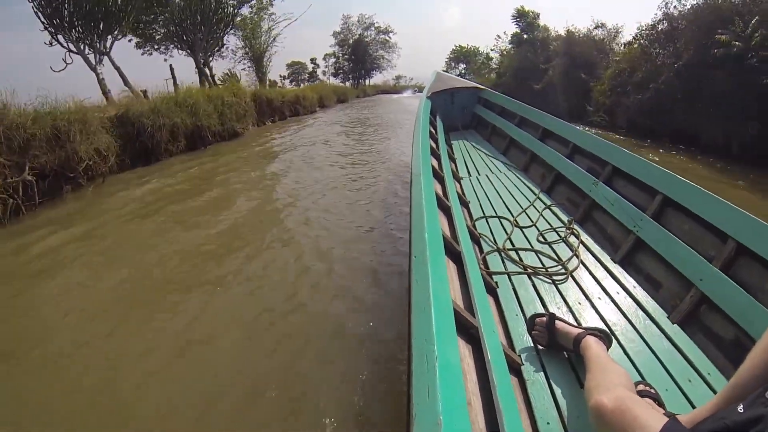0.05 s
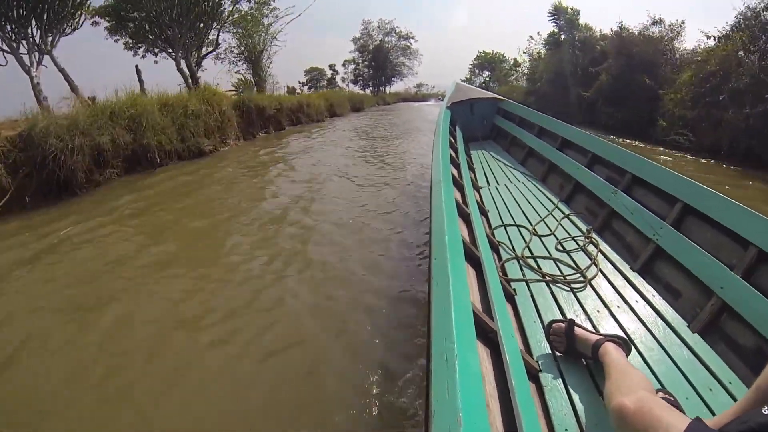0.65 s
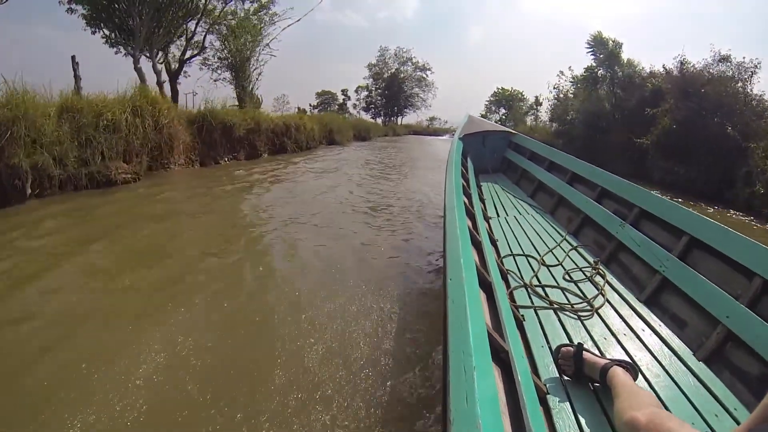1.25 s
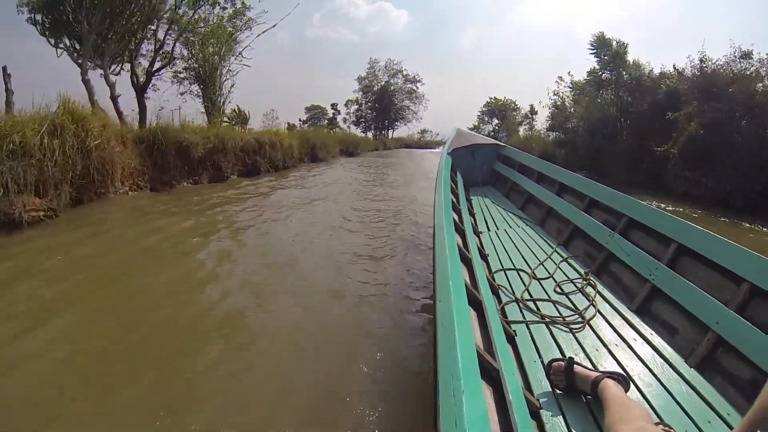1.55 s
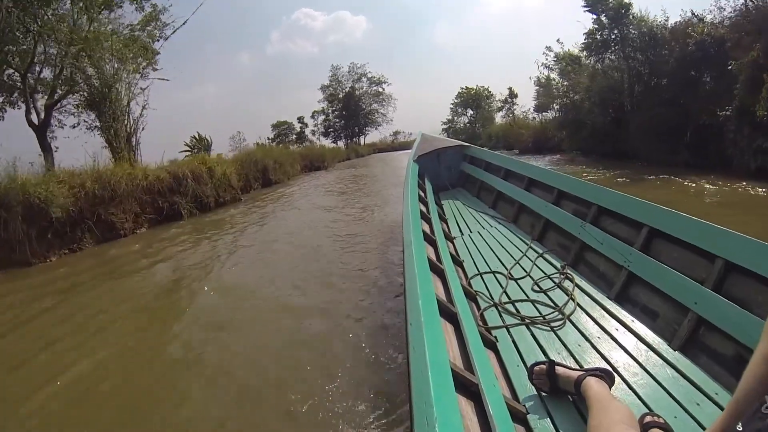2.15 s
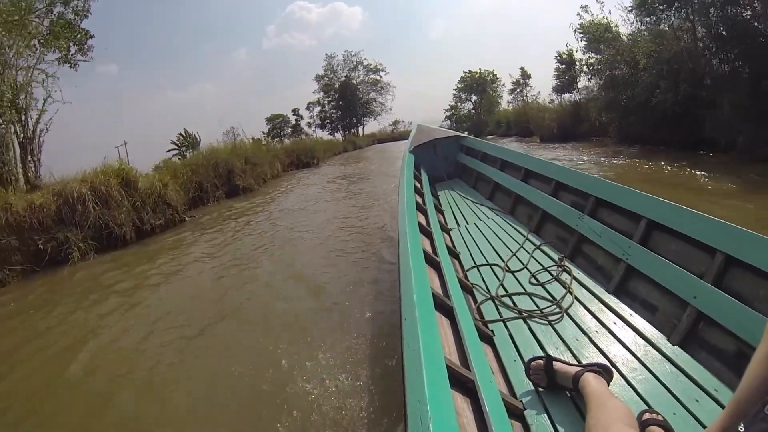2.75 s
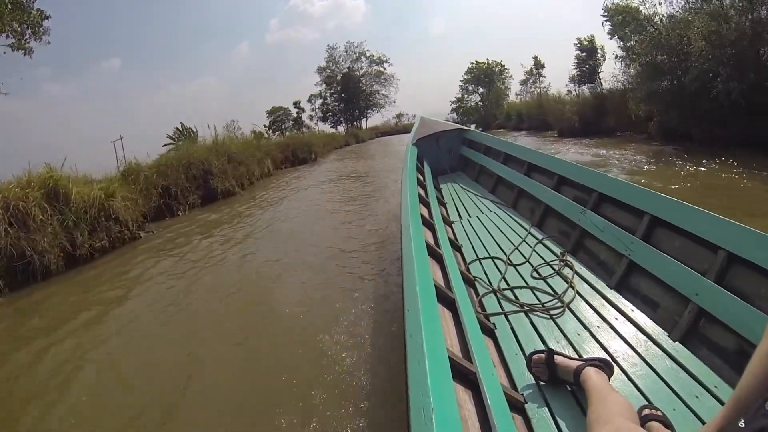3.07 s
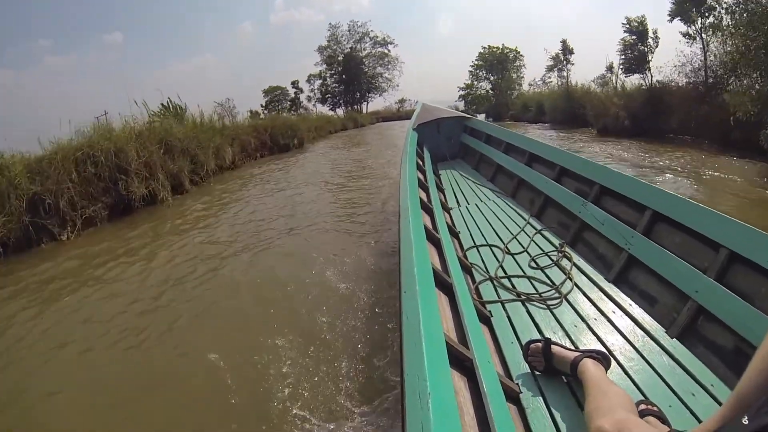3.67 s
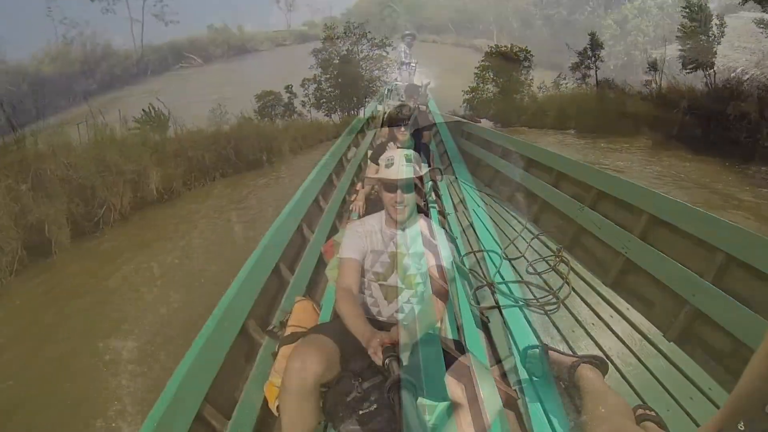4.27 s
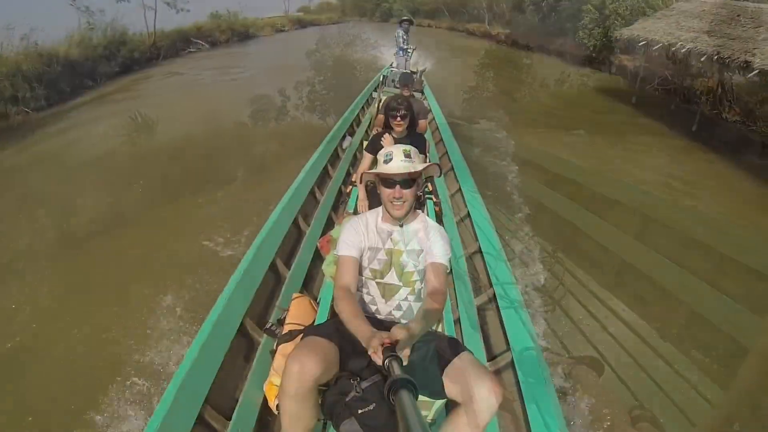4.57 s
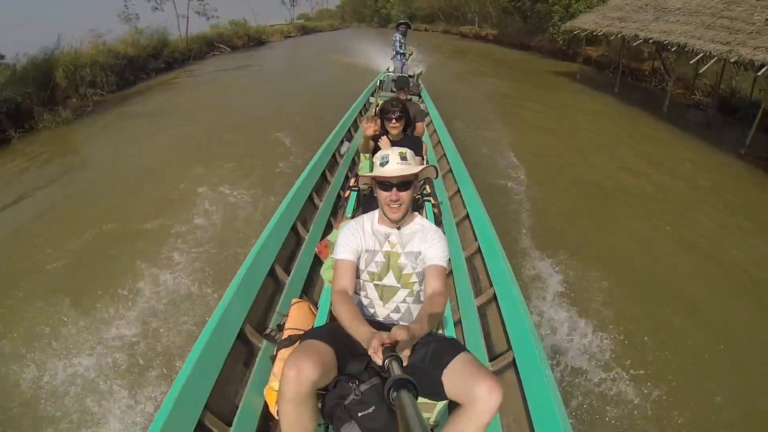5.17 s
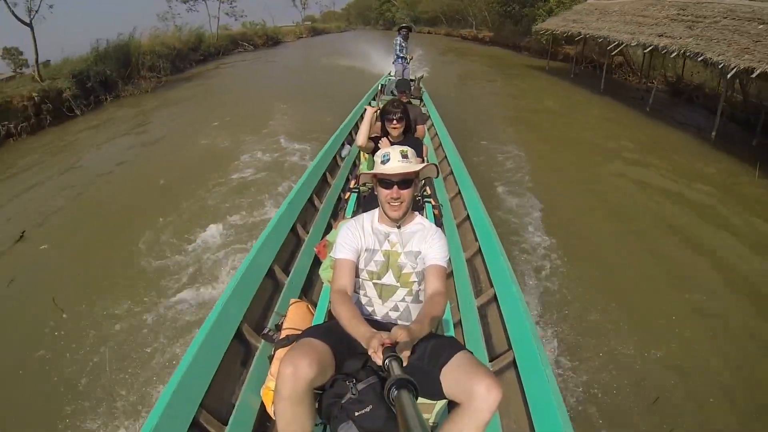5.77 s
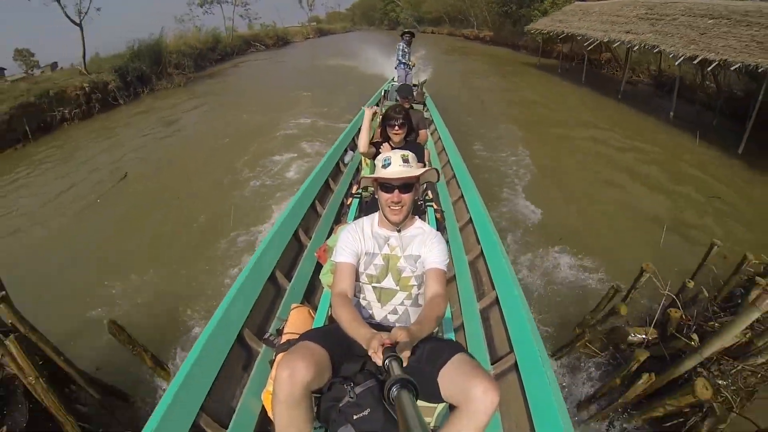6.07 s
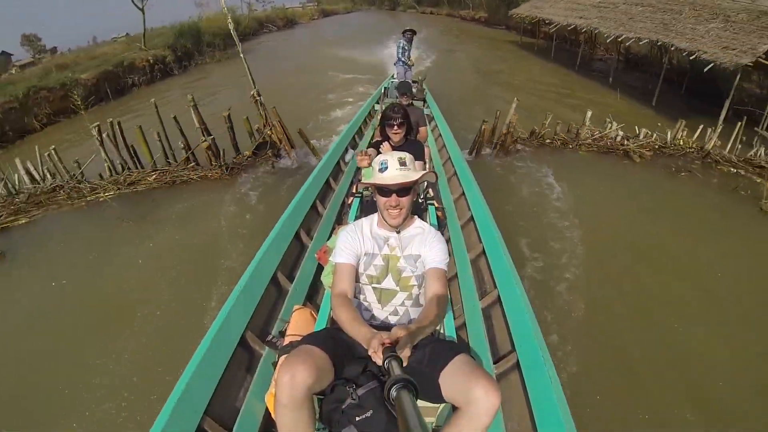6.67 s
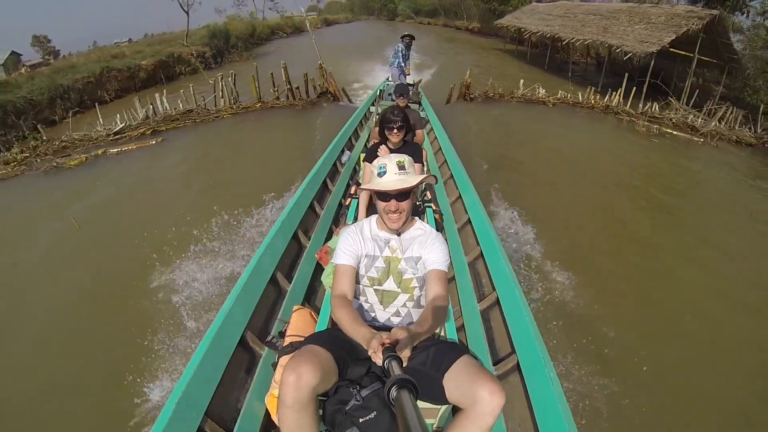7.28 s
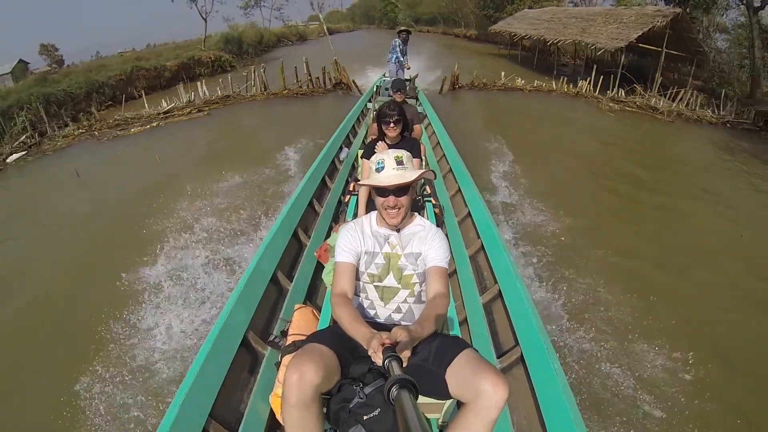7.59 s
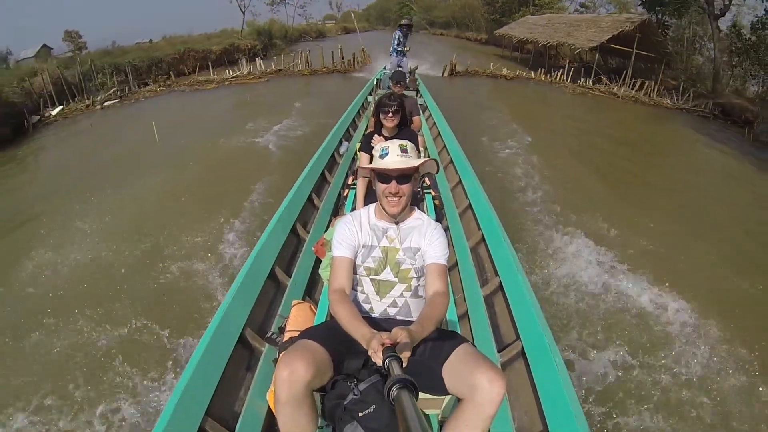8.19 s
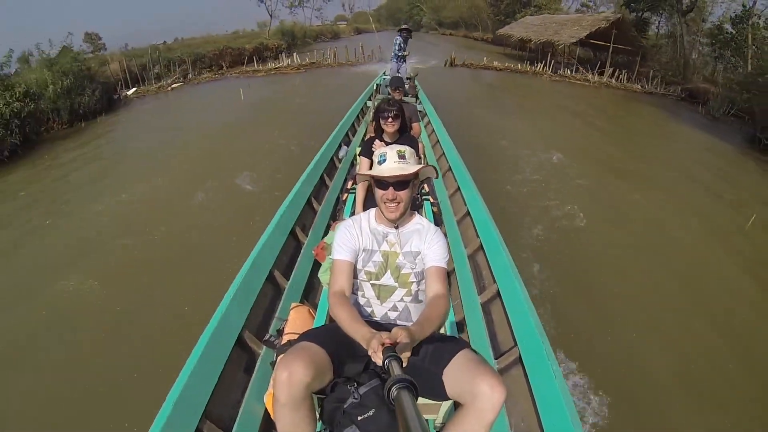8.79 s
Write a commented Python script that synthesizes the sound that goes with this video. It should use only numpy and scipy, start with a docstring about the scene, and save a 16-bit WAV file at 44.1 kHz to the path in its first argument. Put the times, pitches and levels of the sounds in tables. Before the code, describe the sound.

Fast, knocking boat engine on a river, with water slapping the hull, wind and spray; it eases off briefly, then knocks hard again.

```python
"""Long-tail boat on a river channel

A single-cylinder diesel fires about 13 times a second; each blast excites exhaust, hull and metal.
Facing the bow, ripples slap the hull, and bumps on the microphone case make the gain control duck.
The sound then dissolves to a place facing the stern, with spray, wind and gear whine, where the
engine is throttled back for a while and waves knock on the planks."""
import sys
import numpy as np
from scipy import signal
from scipy.fft import rfft, irfft, next_fast_len
from scipy.io import wavfile
from scipy.ndimage import uniform_filter1d, minimum_filter1d

SR = 44100
rng = np.random.default_rng(int(sys.argv[2]) if len(sys.argv) > 2 else 0)


def transcribe(signal):
    """Save signal, clipped to [-1, 1], as a 16-bit WAV file at the path in sys.argv[1]."""
    frames = np.atleast_2d(signal).T
    limited = np.clip(frames, -1, 1)
    pcm = np.round(limited * 32767).astype(np.int16)
    wavfile.write(sys.argv[1], SR, pcm)


N = 389835
TIME = np.arange(N) / SR


def from_db(db):
    """Amplitude ratio of a level in decibels."""
    return 10 ** (np.asarray(db) / 20)


def rms_one(x):
    """Normalisation to unit rms."""
    return x / np.sqrt(np.mean(x ** 2) + 1e-20)


def curve(rows, times=TIME):
    """Linear interpolation between (t/s, value) rows."""
    return np.interp(times, *np.transpose(rows))


def drift(rate_hz):
    """Slow random modulation: low-passed Gaussian noise of unit rms."""
    step = 40   # samples per noise value
    r = np.exp(-2 * np.pi * rate_hz * step / SR)
    slow = signal.lfilter([1], [1, -2 * r, r * r], rng.standard_normal(N // step + 2002))[2000:]
    return np.interp(np.arange(N) / step, np.arange(len(slow)), rms_one(slow))


def band(x, low_hz, high_hz):
    """Four-pole band-pass filter."""
    edges = np.clip([low_hz, high_hz], 10, SR / 2 - 100)
    return signal.sosfilt(signal.butter(2, edges, "band", fs=SR, output="sos"), x + 1e-18)


def soften(x, hz):
    """Two one-pole low-passes spread an impulse in time, as a soft contact does."""
    r = np.exp(-2 * np.pi * hz / SR)
    return signal.lfilter([(1 - r) ** 2], [1, -2 * r, r * r], x + 1e-18)


def ring(force, modes):
    """Modal superposition: each mode (f/Hz, level/dB, T60/s) is a damped oscillator."""
    out = 0
    for hz, db, t60 in modes:
        r = np.exp(-np.log(1000) / (t60 * SR))
        real = r * np.cos(2 * np.pi * hz / SR)
        out = out + from_db(db) * signal.lfilter([1, -real], [1, -2 * real, r * r], force + 1e-18)
    return out


def impulses(times, sizes):
    """Impulse train: one sample of force at each time."""
    out = np.zeros(N)
    np.add.at(out, np.clip(np.asarray(times) * SR, 0, N - 1).astype(int), sizes)
    return out


def burst(since, rise_s, fall_s):
    """Transient envelope: Gaussian rise to time zero, then exponential decay."""
    return np.exp(-(np.minimum(since, 0) / rise_s) ** 2 - np.maximum(since, 0) / fall_s)


def turbulence(spectrum, patchy_db, rate_hz):
    """Flow noise of unit rms, whose third-octave bands swell partly together and partly alone."""
    hz, db = np.transpose(spectrum)
    edges = np.geomspace(hz[0], hz[-1], int(3 * np.log2(hz[-1] / hz[0])) + 2)
    white = rng.standard_normal((2, N))
    together = 0.37 * drift(rate_hz)
    out = 0
    for k, (low, high) in enumerate(zip(edges, edges[1:])):
        out = out + band(white[k % 2], low, high) * from_db(patchy_db * (together + drift(rate_hz)))
    size = next_fast_len(N)
    bin_hz = np.maximum(np.arange(size // 2 + 1) * SR / size, 1)
    shape = from_db(np.interp(np.log(bin_hz), np.log(hz), db))
    return rms_one(irfft(rfft(out, size) * shape, size)[:N])


def firings(speed, first_s):
    """Phase is the integral of rate: firing times, and each sample's time since its beat and index."""
    cycles = np.cumsum(curve(speed)) / SR
    cycles -= np.interp(first_s, TIME, cycles)
    times = np.interp(np.arange(int(cycles[-1]) + 1), cycles, TIME)
    times += rng.normal(0, .0005, len(times))
    beat = np.clip(np.floor(cycles + .1), 0, len(times) - 1).astype(int)   # starts 0.1 cycle early
    return times, TIME - times[beat], beat


def loose_parts(per_s, spread_db):
    """Chatter as a Poisson process: uneven clicks at random times, of unit rms."""
    sizes = from_db(spread_db * np.minimum(rng.exponential(1, N), 4)) * rng.choice([-1, 1], N)
    return rms_one(sizes * (rng.random(N) < per_s / SR))


def exhaust(since, beat, load, body, *, hold_s, fall_s, repeat_share, crack_db, tail_db,
            valve_db, piston_db, clatter_db, uneven_db):
    """Source and filter: gas blast, crack, valves, piston and loose parts excite the body resonances."""
    def per_firing(db, spread_db):
        return from_db(db + spread_db * rng.standard_normal(beat[-1] + 1))[beat]

    force = per_firing(0, uneven_db)
    age = since + 0.0027   # the blast leads the beat
    blast = force * burst(age - np.clip(age, 0, hold_s), 0.00066, fall_s)
    tail = from_db(tail_db) * burst(since, 0.0017, 0.019)
    valves = burst(since - 0.0183, .003, 0.0098) + .7 * burst(since - 0.06, .003, 0.0098)   # two close
    valves *= per_firing(valve_db, 0.95)
    # part of the blast's treble repeats on every stroke; the rest is fresh turbulence
    stroke = band(rng.standard_normal((3, SR)), 1850, 24000)[:, (since * SR).astype(int) % SR]
    fresh = np.sqrt((1 - repeat_share) * blast ** 2 + tail ** 2 + valves ** 2)
    gas = np.sqrt(repeat_share) * blast * stroke + fresh * rng.standard_normal((3, N))
    onsets = np.maximum(np.diff(1. * (since > -.001), prepend=0), 0)
    crack = from_db(crack_db) * soften(onsets * force, 518)
    compressing = (since > .06) | (age < 0)
    piston = from_db(piston_db) * compressing * band(rng.standard_normal(N), 2090, 3400)
    clatter = from_db(clatter_db) * loose_parts(per_s=300, spread_db=1.5)
    source = (gas + crack + piston + clatter) * from_db(curve(load))
    out = 0
    for k, (hz, width, db) in enumerate(body):
        low = np.hypot(hz, width / 2) - width / 2   # hz is the band's geometric centre
        out = out + band(source[k % 3] * per_firing(db, uneven_db), low, low + width)
    return out


def thump(times, load, modes, soft_hz):
    """Impulse response of the hollow hull to each firing's pressure pulse, which grows with load."""
    sizes = from_db(0.63 * curve(load, times) + 2 * rng.standard_normal(len(times)))
    return ring(soften(impulses(times - .002, sizes), soft_hz), modes)


def struck_metal(times, blows, modes, uneven_db=3):
    """Free vibration of the engine's metal: each firing strikes each mode with its own strength."""
    strengths = from_db(uneven_db * rng.standard_normal((len(times), len(modes))))
    return sum(ring(impulses(times, blows * size), [mode]) for mode, size in zip(modes, strengths.T))


# firing rate: t/s, f/Hz
BOW_FIRING_RATE = [(0, 12.687), (1, 12.881), (1.8, 12.935), (2.4, 13.158), (3, 13.114), (3.5, 13.301),
                   (4.4, 13.036)]
# engine load, as strength of the beats: t/s, level/dB
BOW_LOAD = [(0, -4.5), (2.2, -6), (2.95, -1.5), (3.4, -5.5), (4.15, -4), (4.6, -2)]
# resonances of exhaust and microphone case: f/Hz, bandwidth/Hz, level/dB
BOW_RESONANCES = [(841, 160, -17.5), (1368, 156, 2.5), (1530, 197, -2), (2117, 320, -13), (2616, 145, -15),
                  (3090, 330, -15), (3485, 133, -17), (4063, 194, -16), (5310, 440, -26.5),
                  (6200, 2300, -33), (7640, 1070, -25), (10180, 1860, -35.5), (12300, 680, -37),
                  (14200, 550, -41)]
# modes of the hollow hull and of the engine's metal: f/Hz, level/dB, T60/s
BOW_HULL_MODES = [(65, -16.5, 0.057), (38, -38, 0.36), (135.5, -23, 0.095)]
BOW_METAL_MODES = [(527, -53, .3), (1363, -44.5, .3), (2028, -45.5, .3), (2420, -49, .35), (3533, -47, .3),
                   (5160, -47.5, .07), (7010, -49.5, .05), (9870, -61, .04)]
def bow_engine():
    """Periodic excitation: the diesel drives exhaust, hull and metal, heard facing the bow."""
    times, since, beat = firings(BOW_FIRING_RATE, first_s=.012)
    blasts = exhaust(since, beat, BOW_LOAD, BOW_RESONANCES, hold_s=0.0027, fall_s=0.0029,
                     repeat_share=0.33, crack_db=30.5, tail_db=-13, valve_db=-12,
                     piston_db=-11, clatter_db=-21, uneven_db=2)
    boom = thump(times, BOW_LOAD, BOW_HULL_MODES, soft_hz=215)
    return blasts + boom + struck_metal(times, 0.95, BOW_METAL_MODES)


# spectral densities of the water along the hull: f/Hz, level/dB
BOW_WASH_SPECTRUM = [(120, -17), (200, -13), (437, -22), (525, -9), (607, -20.5), (827, -11), (957, -21),
                     (1400, -6.5), (1840, -13), (2090, -14), (3480, -22), (4580, -25), (7760, -33),
                     (13900, -50.5), (15500, -56)]
BOW_RUMBLE_SPECTRUM = [(12, -44), (20, 4), (36, 4), (81, -2.5), (129, 4.5), (173, -14), (233, -8.5),
                       (300, -20), (400, -19), (520, -32), (880, -120)]
def bow_water():
    """Turbulent flow along the hull gives a broadband wash over a low rumble."""
    wash = from_db(-40.5) * turbulence(BOW_WASH_SPECTRUM, patchy_db=2.04, rate_hz=12)
    rumble = from_db(-33) * turbulence(BOW_RUMBLE_SPECTRUM, patchy_db=-1, rate_hz=4.9)
    return wash + rumble


# impacts of the larger ripples: t/s, level/dB
LARGE_RIPPLES = [(.44, -15), (.602, -10.5), (1.711, -9), (1.978, -11), (2.383, -16), (2.586, -13),
                 (2.782, -8), (3.041, -5.5), (3.485, -11.5), (3.643, -8), (3.915, -10), (4.065, -9.5)]
# modes of the slapped hull: f/Hz, level/dB, T60/s
SLAP_MODES = [(134, 2.5, 0.15), (94.5, -41, 0.059), (231, -23, 0.14)]
def hull_slaps(small_per_s=4, until_s=4.55):
    """Soft impacts: large and small ripples ring the hull, and water churns briefly after each."""
    count = int(small_per_s * until_s)
    offset, size = rng.random((count, 2)).T
    small_ripples = np.column_stack([(np.arange(count) + offset) / small_per_s, -20 + 6 * size])
    times, db = np.vstack([LARGE_RIPPLES, small_ripples]).T
    slaps = ring(soften(impulses(times, from_db(db)), 121), SLAP_MODES)
    churn = sum(from_db(level) * burst(TIME - at - .008, 0.012, 0.033) for at, level in zip(times, db))
    return slaps + from_db(-22.5) * churn * rms_one(band(rng.standard_normal(N), 183, 233))


# bumps on the microphone case: t/s, level/dB, cutoff/Hz, scrape/dB, scrape decay/s, boom/dB
CASE_BUMPS = [(0.6429, 17, 850, -15, 0.0036, -21), (0.645, 25.5, 680, -3, 0.0048, 5.5),
              (.665, -5.5, 1600, -28, .006, -4), (.721, 1, 905, -16, 0.0047, -11),
              (0.7364, 4.5, 1590, -19, 0.0023, -21), (0.738, 2, 1180, -7.5, 0.0048, 6),
              (0.973, 25.5, 2040, 8, 0.0018, 6.5), (0.9749, 25.5, 1650, -2.5, 0.0038, -10),
              (1.066, -16, 800, -13.5, 0.0065, -3), (1.074, 21.5, 186, -13, .003, -2)]
# modes of the case and of its mount: f/Hz, level/dB, T60/s
CASE_MODES = [(42.7, -7.5, 0.021), (260, -14.5, 0.025), (414, -10.5, 0.0082), (825, -4, 0.0067),
              (1360, -2.5, 0.0074), (1540, -30, 0.013), (2710, -7.5, 0.0068)]
MOUNT_MODES = [(133.1, 1, 0.31), (228, -4, .08)]
def case_bumps():
    """Structure-borne sound: each bump pushes and scrapes the case and sets its mount humming."""
    knocks = 0
    for at, db, cutoff_hz, scrape_db, scrape_s, _ in CASE_BUMPS:
        scrape = from_db(scrape_db) * burst(TIME - at, 0.00023, scrape_s) * rng.standard_normal(N)
        contact = ring(impulses([at], from_db(db)) + band(scrape, 400, 8000), CASE_MODES)
        softness = signal.butter(4, cutoff_hz, fs=SR, output="sos")   # soft contacts lose treble
        knocks = knocks + signal.sosfilt(softness, contact)
    times, *_, boom_db = np.transpose(CASE_BUMPS)
    return knocks + ring(soften(impulses(times, from_db(boom_db)), 370), MOUNT_MODES)


# firing rate: t/s, f/Hz
STERN_FIRING_RATE = [(4, 13.303), (4.8, 13.45), (5.6, 13.55), (6.3, 13.412), (6.8, 13.041), (7.5, 10.539),
                     (8.2, 10.96), (8.8, 11.33)]
# engine load; the throttle is shut from 6.8 to 8.2 s, then the engine knocks hard: t/s, level/dB
STERN_LOAD = [(4.3, -23.5), (4.6, -11), (5.4, -17.5), (6.05, -13.5), (6.81, -19.5), (6.88, -31.5),
              (8.13, -34), (8.21, -13.5), (8.8, -24)]
# resonances of exhaust and microphone case: f/Hz, bandwidth/Hz, level/dB
STERN_RESONANCES = [(820, 430, -9.5), (1338, 72, 2.5), (1670, 340, -8.5), (2366, 290, -4.5),
                    (2836, 250, -5), (3310, 580, -16), (4160, 340, -16.5), (4900, 1240, -21.5),
                    (7520, 770, -19.5), (8880, 310, -21.5), (10130, 1500, -30.5), (9600, 1500, -42),
                    (12700, 550, -54), (13730, 990, -39)]
# modes of the hollow hull and of the engine's metal: f/Hz, level/dB, T60/s
STERN_HULL_MODES = [(49, -12.5, 0.12), (40, -24.5, 0.14)]
STERN_METAL_MODES = [(2404, -75, 0.24), (3810, -50, 0.038), (5456, -53, 0.087), (7750, -53, .005),
                     (11500, -51, .004)]
def stern_engine():
    """Periodic excitation heard facing the stern; harder firings ring the metal harder."""
    times, since, beat = firings(STERN_FIRING_RATE, first_s=3.97)
    blasts = exhaust(since, beat, STERN_LOAD, STERN_RESONANCES, hold_s=0.0028, fall_s=0.0033,
                     repeat_share=0.28, crack_db=8, tail_db=-12.5, valve_db=-39,
                     piston_db=-13, clatter_db=-26, uneven_db=1.6)
    boom = thump(times, STERN_LOAD, STERN_HULL_MODES, soft_hz=232)
    blows = rms_one(from_db(curve(STERN_LOAD, times)))
    return blasts + boom + struck_metal(times, blows, STERN_METAL_MODES)


# spray of the wake, which falls as the throttle shuts and builds again: t/s, level/dB
WAKE_LEVEL = [(4.5, -53), (4.95, -49), (6.1, -48), (6.55, -54), (7, -59.5), (7.7, -50.5), (8.22, -46.5),
              (8.47, -53), (8.84, -51.5)]
# spectral densities of wash and spray: f/Hz, level/dB
STERN_WASH_SPECTRUM = [(150, -14), (250, -9), (388, -6), (501, -22.5), (544, -11.5), (702, -11.5),
                       (779, -8.5), (1140, -12), (1460, 4.5), (1800, -8.5), (2060, -15.5), (2400, -6.5),
                       (2630, -15), (3030, -11), (4000, -30), (5200, -66), (8800, -120)]
SPRAY_SPECTRUM = [(1760, 5.5), (3000, -8), (3640, -0.5), (3870, -8.5), (4170, -5), (5060, -5), (5880, -9),
                  (6610, -7), (9070, -17), (9980, -14.5), (10800, -21), (14000, -23), (15500, -32)]
def stern_water():
    """Wake turbulence drives the spray and, less strongly, the wash, which sinks as the boat slows."""
    spray_db = curve(WAKE_LEVEL)
    slowing_db = np.interp(TIME, (5.6, 7.6), (1.5, -1.5))
    wash_db = -41.5 + 0.39 * (spray_db - spray_db.mean()) + slowing_db
    wash = from_db(wash_db) * turbulence(STERN_WASH_SPECTRUM, patchy_db=1.6, rate_hz=20)
    spray = from_db(spray_db) * turbulence(SPRAY_SPECTRUM, patchy_db=1.76, rate_hz=12)
    return wash + spray


# strength of the headwind: t/s, level/dB
GUST_LEVEL = [(4.4, -27.5), (4.95, -24), (5.3, -27), (5.9, -26), (6.7, -27.5), (7.15, -26.5), (7.85, -25),
              (8.4, -29.5), (8.75, -27.5)]
# spectral density of the buffeting: f/Hz, level/dB
WIND_SPECTRUM = [(11, -25), (18, 0), (38, 2.5), (48, -2.5), (70, -14), (124, -9.5), (158, -21), (194, -18),
                 (236, -30), (454, -39.5), (500, -33.5), (650, -57), (1100, -120)]
def wind():
    """Turbulent pressure fluctuations: the headwind buffets the microphone in gusts."""
    return from_db(curve(GUST_LEVEL)) * turbulence(WIND_SPECTRUM, patchy_db=1.53, rate_hz=9.1)


# whine of the propeller gear: t/s, level/dB
WHINE_LEVEL = [(4.6, -72), (5.15, -55), (5.8, -55), (6.6, -53), (6.9, -62), (8.84, -91)]
def gear_whine(cycles_per_firing=42):
    """Gear meshing gives a wavering tone whose frequency is proportional to engine speed."""
    hz = cycles_per_firing * curve(STERN_FIRING_RATE) * (1 + 0.0126 * drift(18.7))
    amplitude = from_db(curve(WHINE_LEVEL) + 2.4 * drift(14))
    return amplitude * np.sin(2 * np.pi * np.cumsum(hz) / SR)


# impacts of waves on the stern: t/s, level/dB
WAVE_KNOCKS = [(7.054, -34), (7.701, -26.5), (8.564, -30.5)]
# modes of the planks: f/Hz, level/dB, T60/s
PLANK_MODES = [(269, -3, 0.08), (377, -12, 0.078), (553, -11, 0.048), (800, -8, .04)]
def wave_knocks():
    """Impact excitation: waves strike the stern planks, whose damped modes ring briefly."""
    times, db = np.transpose(WAVE_KNOCKS)
    return ring(soften(impulses(times, from_db(db)), 900), PLANK_MODES)


def scene(dissolve_s=(3.89, 4.55)):
    """Superposition of the sources, with an equal-power crossfade from bow to stern."""
    bow = bow_engine() + bow_water() + hull_slaps()
    stern = stern_engine() + gear_whine() + stern_water() + wind() + wave_knocks()
    angle = np.interp(TIME, dissolve_s, [0, np.pi / 2])
    return (np.cos(angle) * bow + np.sin(angle) * stern + case_bumps())[None]


def gain_control(x, threshold_db, slope, ahead_s, hold_s, release_db_per_s):
    """Look-ahead compression: the gain ducks at once under a loud sound, holds and recovers slowly."""
    power = np.abs(uniform_filter1d(x ** 2, size=256))
    excess_db = np.maximum(10 * np.log10(power + 1e-12) - threshold_db, 0)
    ahead, hold = int(ahead_s * SR), int(hold_s * SR)
    held_db = -minimum_filter1d(-slope * excess_db, hold, origin=(hold - 1) // 2)
    release_db = release_db_per_s * TIME
    duck_db = np.maximum.accumulate(held_db + release_db) - release_db
    early_db = np.pad(duck_db[ahead:], (0, ahead), "edge")
    return x * from_db(-soften(early_db, 300))


def record(dry, cutoff_hz=15400):
    """Compression, soft saturation of the hardest bumps and a steep low-pass."""
    ducked = gain_control(dry[0], threshold_db=-9, slope=0.71, ahead_s=.009, hold_s=0.015,
                          release_db_per_s=19)
    rounded = ducked / (1 + ducked ** 4) ** (1 / 4)
    low_pass = signal.ellip(10, .1, 80, cutoff_hz, fs=SR, output="sos")
    return signal.sosfilt(low_pass, rounded)[None]


dry = scene()
out = record(dry)
transcribe(out)
```